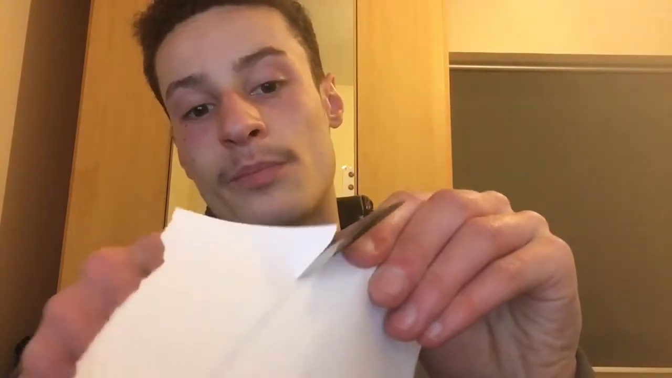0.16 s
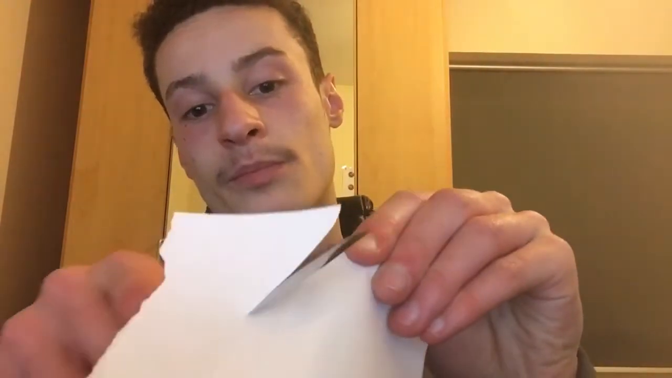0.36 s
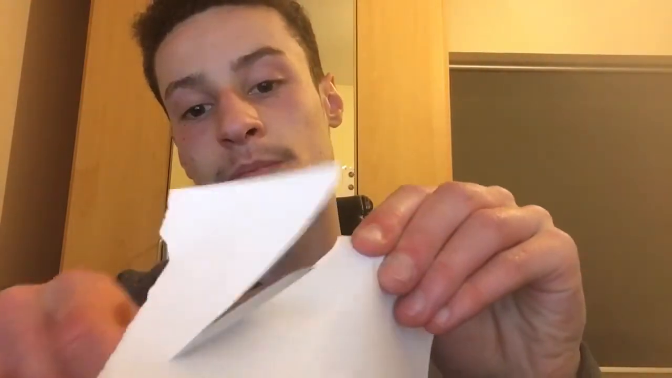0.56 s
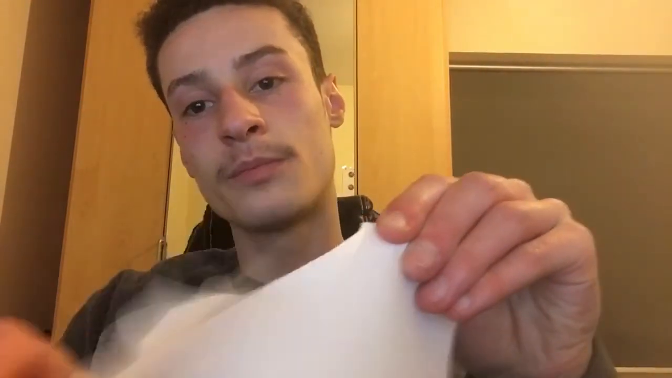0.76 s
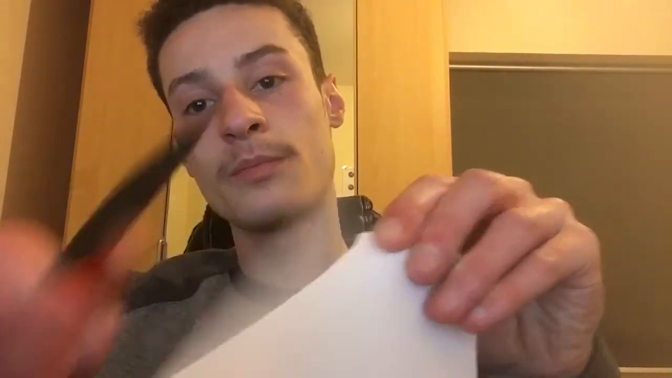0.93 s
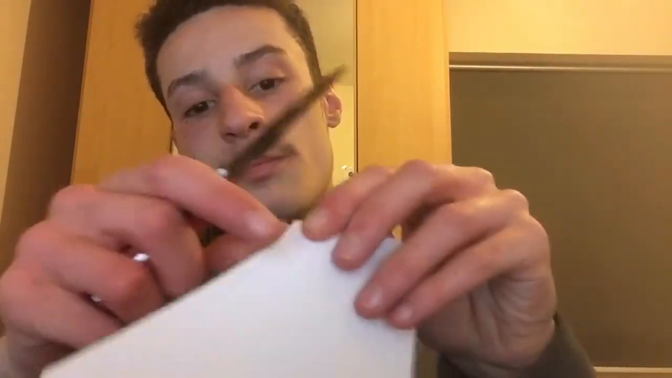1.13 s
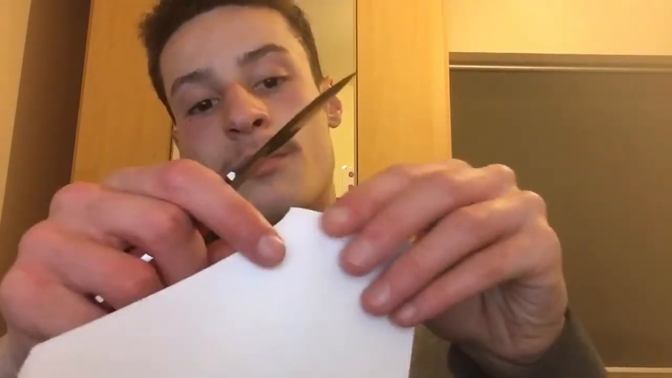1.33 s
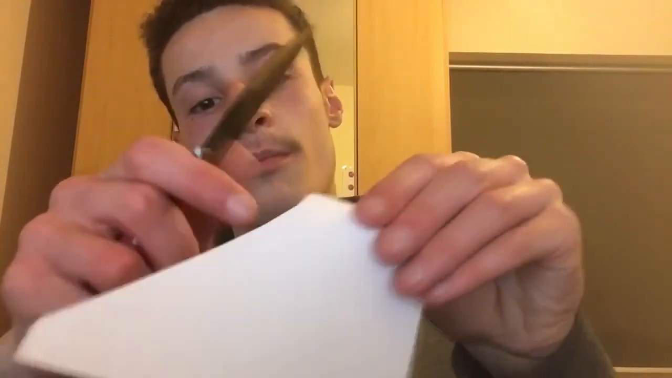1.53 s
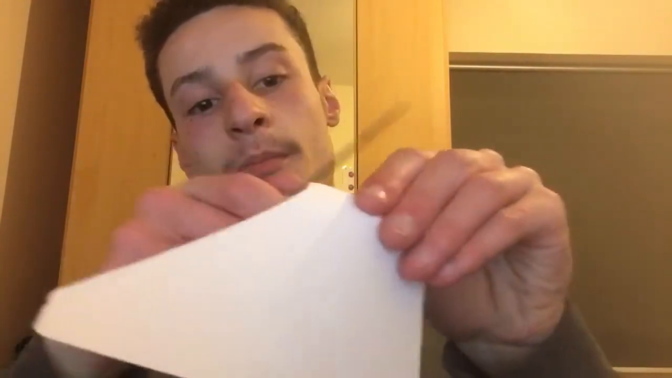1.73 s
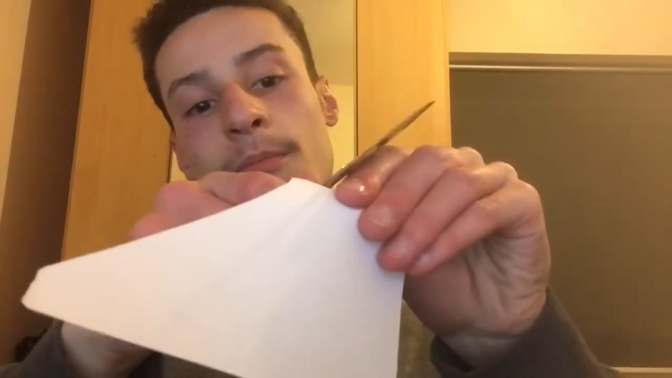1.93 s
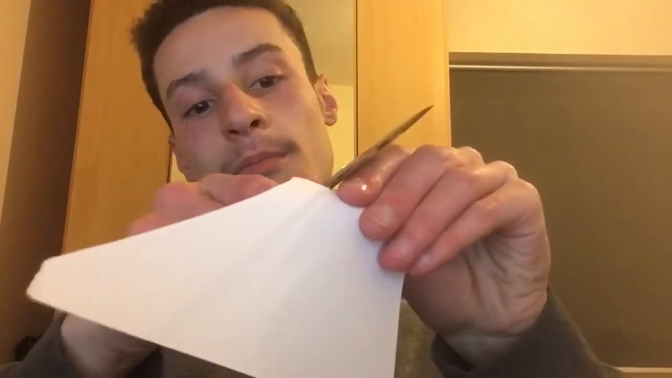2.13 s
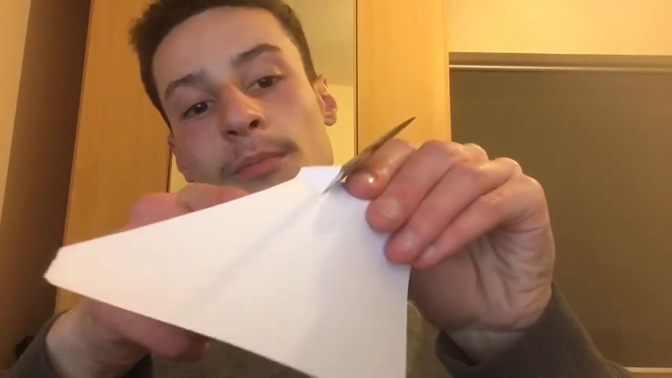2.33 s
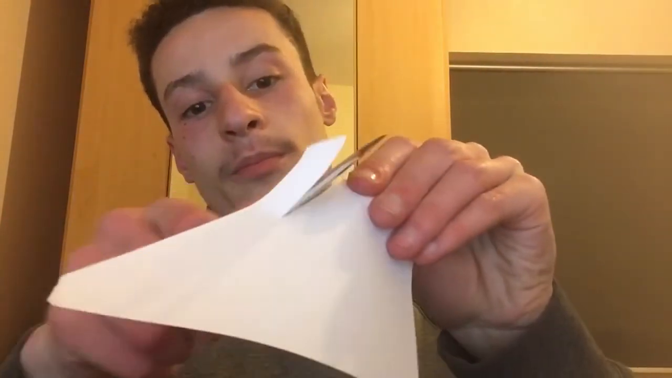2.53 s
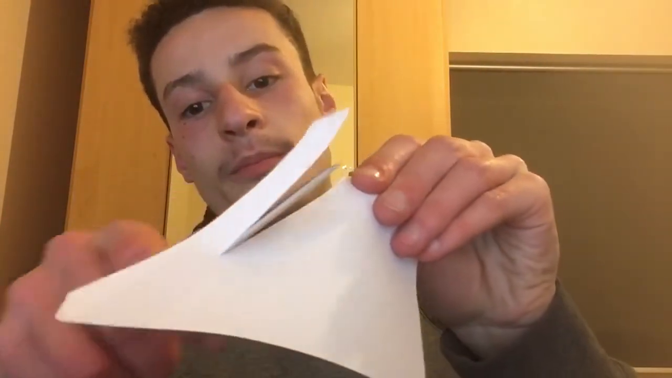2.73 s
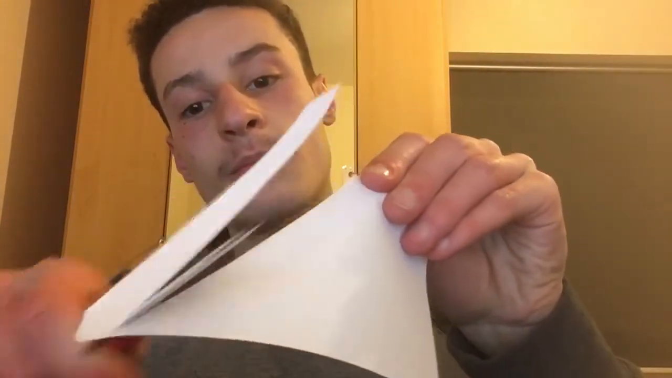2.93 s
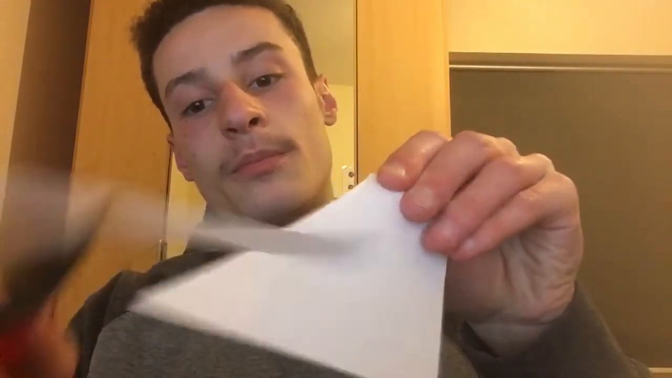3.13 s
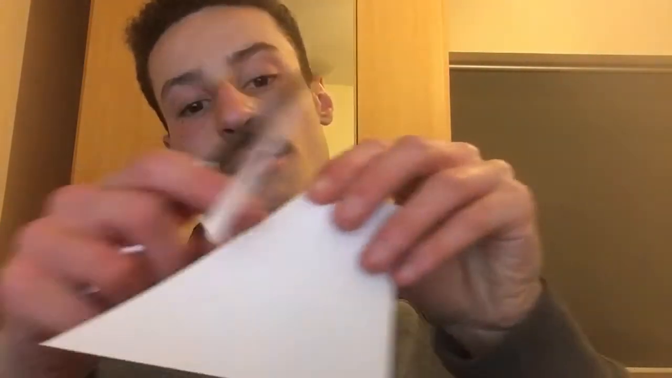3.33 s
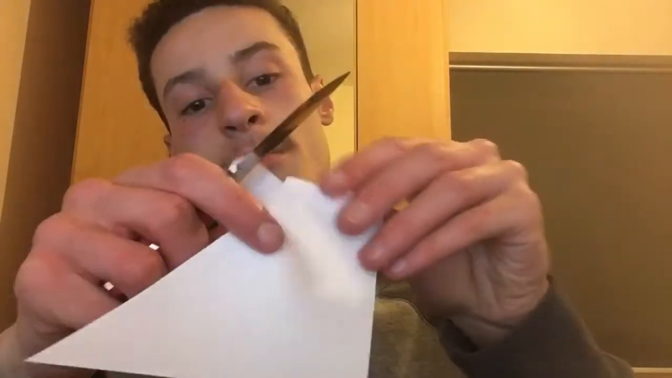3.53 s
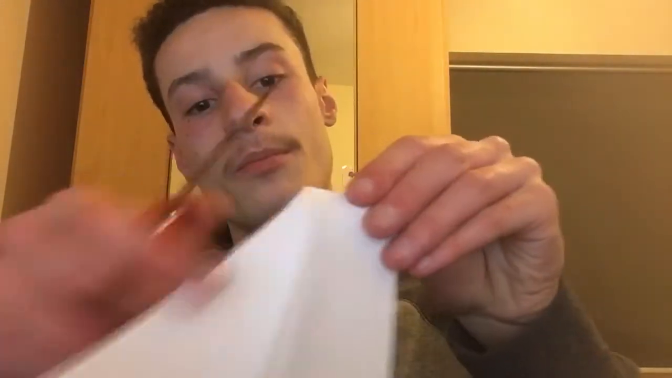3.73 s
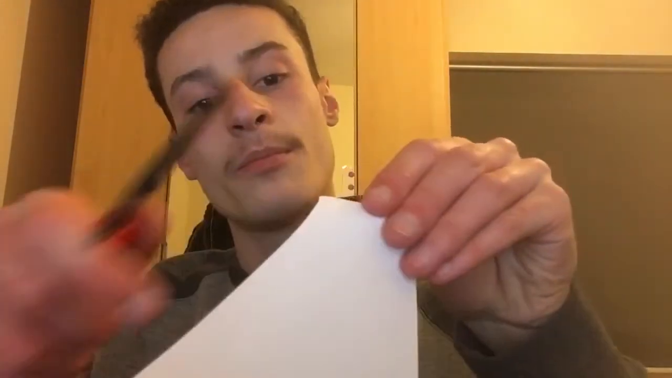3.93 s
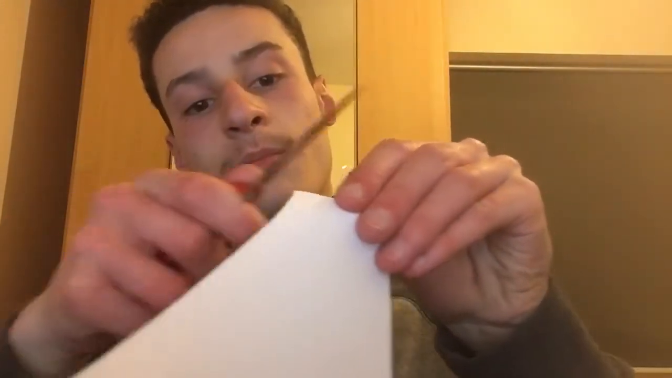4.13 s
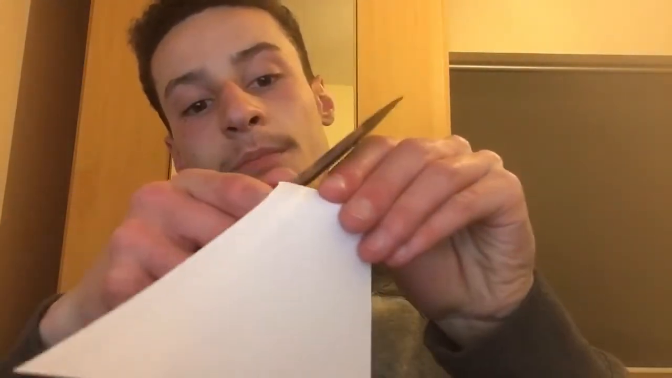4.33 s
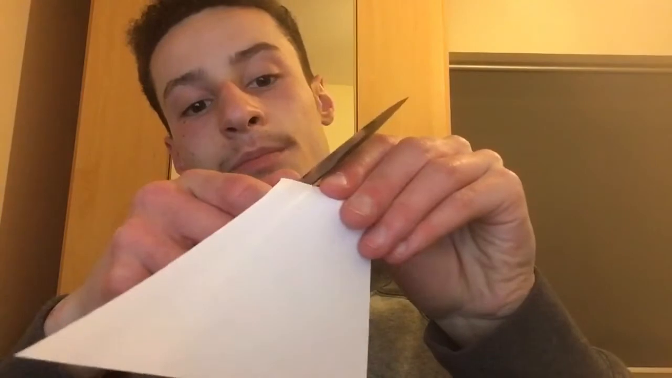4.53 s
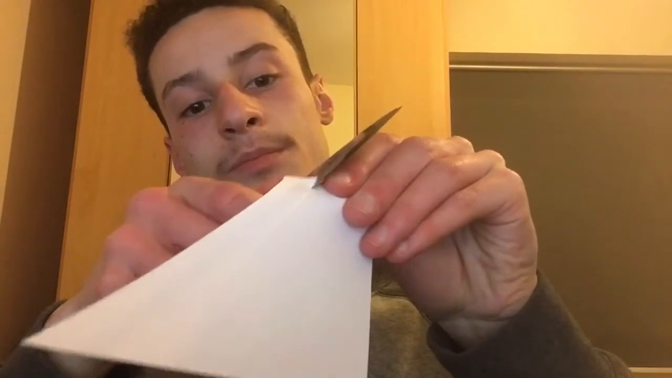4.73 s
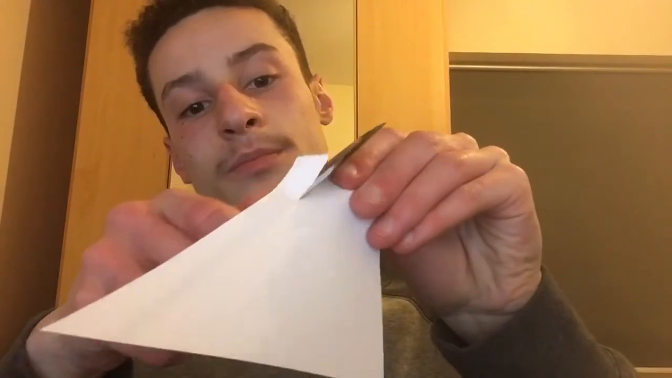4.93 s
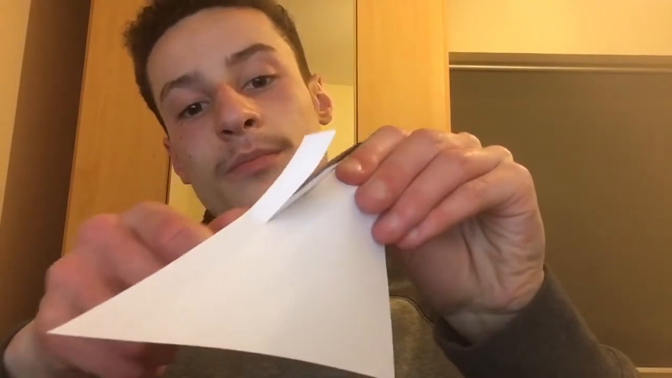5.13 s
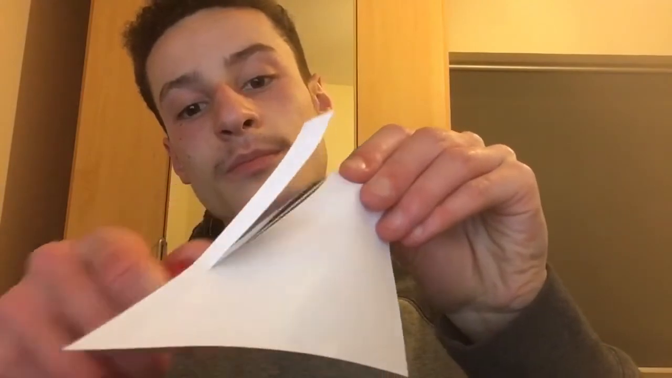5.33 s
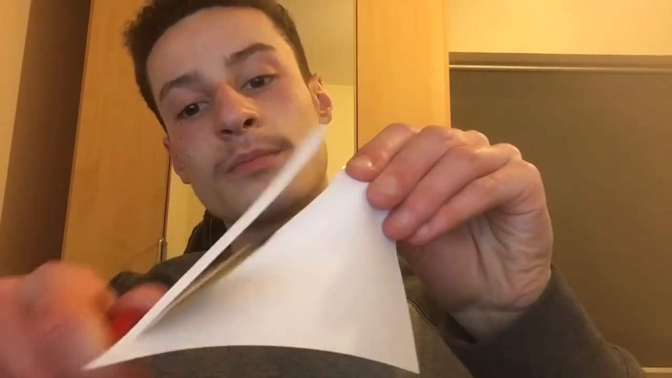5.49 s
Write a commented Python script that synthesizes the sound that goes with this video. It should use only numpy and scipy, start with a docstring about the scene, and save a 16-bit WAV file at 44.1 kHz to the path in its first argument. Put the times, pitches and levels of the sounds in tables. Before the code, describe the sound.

Very close, a sharp knife immediately slices a strip off a sheet of paper with a bright, rasping hiss of about half a second. The sheet rustles, crackles and pops softly as it is regripped. A second cut begins slowly and speeds up, more handling follows, then two tiny edge scrapes lead into a third cut. Small, quiet indoor room with a barely audible hum and short reflections.

```python
"""A faint appliance hum and soft air lie under everything in a small room: steady partials and shaped noise.
A sharp knife at once slices a strip off a hand-held sheet of paper, close by: a stream of snapping fibres
excites the sheet, the rasp and the hiss, while noise through sinking resonances makes the strip flutter lower.
As each strip comes free the sheet is regripped: sparse creases rustle, bent tones pop, noise bursts crackle.
A second cut follows at 2 s; near 4.5 s the blade scrapes the edge twice, then makes the third and last cut."""
import sys
import numpy as np
from scipy import signal
from scipy.fft import rfft, irfft, next_fast_len
from scipy.io import wavfile
from scipy.ndimage import map_coordinates

SR = 44100
rng = np.random.default_rng(int(sys.argv[2]) if len(sys.argv) > 2 else 0)


def digitize_waveform(pressure):
    """Quantize a signal to 16-bit integers and store it at the path in sys.argv[1].

    Rows of a 2-D input are taken as channels; values are limited to [-1, 1].
    """
    field = np.atleast_2d(pressure).T
    bounded = np.clip(field, -1, 1)
    quanta = np.round(bounded * 32767).astype(np.int16)
    wavfile.write(sys.argv[1], SR, quanta)


N = 245195

# Partials of the appliance hum: pitch_hz, level_db
HUM_PARTIALS = [(53, -66), (120, -73.5), (576, -71.5), (1152, -85.5), (1696, -83)]
# Colour of the air noise: frequency_hz, density_db (per Hz, relative)
AIR_COLOUR = [(15, -36.5), (25, -15), (123, -3.5), (170, -11.5), (309, -0.5), (489, -8.5), (575, -5),
              (863, -13), (1560, -13.5), (1700, -12), (2050, -15.5), (2840, -15.5), (4870, -26),
              (14000, -36.5), (16000, -47.5)]
# Each cut: the blade bites at the edge, then runs down the sheet until the strip comes free:
# start_s, run_s, end_s, sheet_swell_s, sheet_bite_db, sheet_run_db, rasp_bite_db, rasp_run_db,
# hiss_bite_db, hiss_run_db, hiss_missing_at_contact_db, best_glide_at (share of run, 0-1),
# strip_against_sheet_db, hollow_ring_db, stub_bending_hz, blade_resonance_at_run_hz, rasp_hz,
# late_hiss_hz, treble_gap_at_glide_hz
CUTS = [(0.0, 0.01, 0.627, .17, -34.8, -26.8, -37, -32, -32.5, -35.6, 6, .47, -20, -24, 540, 3100, 5600, 13300, 7700),
        (2.027, 2.29, 2.884, .26, -39.5, -27.8, -40, -32, -40.8, -33.7, 25, .45, -21.5, -10, 680, 2500, 7000, 12000, 12500),
        (4.602, 4.98, 5.486, .15, -39.3, -28.4, -40.5, -36, -42.5, -33.8, 13, .32, -22.5, -7, 430, 2650, 6000, 12300, 12000)]
# Colours of the cut, low to high: frequency_hz, density_db (per Hz, relative)
SHEET_COLOUR = [(150, -41), (600, -19.5), (920, -14), (1100, -9.5), (1300, -1.5), (1560, -1.5), (1900, 5.5),
                (2090, -3.5), (2350, 3), (3000, -1), (4300, -6.5), (4900, -23), (6500, -38.5),
                (12000, -77.5)]
RASP_COLOUR = [(2000, -38), (4200, -2.5), (5000, -3.5), (6100, -3), (7500, -8.5), (9300, -9),
               (10500, -16.5), (13000, -35.5)]
HISS_COLOUR = [(8000, -27.5), (10500, -13), (11700, -1.5), (12500, -3), (13800, -8.5), (15800, -13.5)]
# The blade catches around its entry and exit: start_s, level_db, t60_s
CATCHES = [(0.612, -26.5, .05), (2.057, -34.5, 0.049), (2.065, -34, 0.0089), (2.091, -34, .01),
           (2.879, -33.5, 0.008), (4.446, -34, 0.027), (4.606, -44, 0.032), (5.4815, -19, 0.013)]
# Colour of a catch: frequency_hz, density_db (per Hz, relative)
CATCH_COLOUR = [(200, -18), (800, -8), (1400, 3), (2200, -7.5), (4000, 1), (5200, -4), (10000, -11),
                (12500, -11), (15800, -13)]
# The sheet rustles as it is let go or regripped: peak_s, rustle_db, crinkle_db, rise_s, t60_s
RUSTLES = [(.635, -52.5, -53, .02, 0.34), (0.686, -62, -52, 0.042, 0.24), (1.074, -55, -72, 0.031, 1.06),
           (1.289, -62, -67, 0.17, 0.3), (1.431, -60, -77, .1, 0.17), (1.982, -75, -77, 0.29, 0.76),
           (2.9, -57.5, -76, 0.018, 0.4), (2.96, -53, -80, .015, 0.29), (3.018, -64.5, -69, .06, 0.36),
           (3.395, -66, -67.5, .15, 0.74), (3.49, -63, -82, .12, 1.6), (3.82, -60, -72.5, 0.31, 0.42),
           (5.498, -44, -43.5, .01, 0.093)]
# Body and treble colours of a rustle: frequency_hz, density_db (per Hz, relative)
RUSTLE_COLOUR = [(100, -24), (330, 17.5), (800, 0.5), (1400, 2.5), (2800, -1), (4300, -7), (7000, -18)]
CRINKLE_COLOUR = [(2500, -26), (4500, -3.5), (7000, 3.5), (10000, -10.5), (12500, -0.5), (15800, -12)]
# The sheet buckles with a dull pop: start_s, level_db, pitch_hz, t60_s
POPS = [(.631, -43.5, 85, 0.057), (.986, -37.5, 593, .08), (.991, -40, 318, 0.059), (1.01, -50, 90, 0.13),
        (1.066, -37.5, 320, 0.041), (1.067, -48, 99, .12), (1.142, -48.5, 346, .14),
        (1.244, -50, 258, .046), (1.245, -42, 106, 0.051), (2.885, -44, 120, 0.037),
        (3.36, -47.5, 257, .088), (3.37, -44, 104, 0.067), (3.616, -52, 380, .09), (5.493, -40, 283, .06)]
# The handled paper snaps: peak_s, level_db, brightness_db (per octave above 1 kHz), t60_s
SNAPS = [(.738, -45.5, 3, 0.043), (0.985, -49, 1.5, 0.037), (1.062, -41.5, 0, .065),
         (1.068, -42.5, 1, 0.034), (1.163, -36.5, -1, 0.027), (1.229, -43, -1, 0.02),
         (1.2397, -28.5, 4.5, .011), (1.242, -42.5, -5, .05), (1.295, -36.5, -2, 0.036),
         (1.365, -48, -0.5, 0.056), (1.915, -53.5, 3, .014), (1.935, -56.5, 2.5, .047),
         (1.961, -54.5, 3, 0.096), (1.984, -50, 4, 0.01), (2.943, -36, 0.5, 0.039), (3.232, -52, 3.5, .02),
         (3.333, -46.5, 1, 0.031), (3.342, -43, 2, 0.011), (3.359, -42, -6, .03), (3.392, -49.5, 1, .02),
         (3.749, -48, 6.5, 0.016), (3.775, -41, 8, 0.02), (4.367, -49.5, 4.5, 0.017)]
# Colour of a snap: frequency_hz, density_db (per Hz, relative)
SNAP_COLOUR = [(100, -5), (400, -4), (900, -3), (1400, 4.5), (2000, 2.5), (3000, -1.5), (4000, -6.5),
               (5200, -10), (10000, -20.5), (12500, -22), (15800, -30)]
# Fingers and blade slide along the sheet:
# peak_s, level_db, bell_width_s, brightness_db (per octave above 1 kHz)
SLIDES = [(1.433, -47.5, 0.013, 5.5), (1.452, -44, 0.0087, -1.5), (3.041, -56, 0.01, 13),
          (3.205, -63, 0.019, 14.5), (3.366, -48, 0.014, 2), (3.453, -56.5, 0.026, 9),
          (3.565, -57, 0.012, 11)]
# Colour of a slide: frequency_hz, density_db (per Hz, relative)
SLIDE_COLOUR = [(100, -4), (500, -4.5), (900, -0.5), (1450, 7.5), (2100, -3), (3200, -11.5), (5000, -24),
                (15000, -43.5)]
# The blade scrapes the edge without entering: start_s, length_s, level_db
SCRAPES = [(4.45, 0.074, -46.5), (4.525, 0.077, -52)]
# Decay of the room: frequency_hz, t60_s
ROOM_DECAY = [(200, 0.1976), (2000, 0.3), (6000, 0.18), (14000, 0.2)]

ATTACK_S, RELEASE_S, SPEED_UP_S = 0.0028, 0.0027, 0.094  # the blade enters, leaves, gathers speed
# rise of each layer as pressure builds before the run; a negative rise is a fall
BITE_DB_PER_S, RASP_BITE_DB_PER_S, HISS_BITE_DB_PER_S = 6.5, 3, -22.5
SHEET_FADE_DB, RASP_FADE_DB, STRIP_FADE_DB = -2.5, -4.5, -6.5  # change over one run
EXIT_DB, EXIT_S = 0.5, 0.07  # the last fibres tear with a harder rasp
# the hiss builds up after contact; the lower layers follow by these shares of its rise
HISS_LAG_S, SHEET_LAG_SHARE, RASP_LAG_SHARE = .2, .12, 0.27
# a gliding edge is smoother (widths and places are shares of the run)
GLIDE_WIDTH, GLIDE_RASP_DB, GLIDE_HISS_DB = 0.17, -6.5, -10.5
# a gap slides down the treble in the glide: fall over one run, width in octaves, depth
NOTCH_OCTAVES, NOTCH_WIDTH, NOTCH_DB = 2.3, 0.31, -3
# late swell of the hiss, and its change over the run
HISS_PEAK_AT, HISS_PEAK_WIDTH, HISS_PEAK_DB, HISS_FADE_DB = 0.65, .2, 5.9, -11.5
HISS_START_HZ = 14800  # the hiss sinks from about here to its late pitch
BITE_HZ, BLADE_RISE_HZ = 3600, 2200  # blade resonance well before the run, and its climb over the run
BLADE_DB, BLADE_PEAK_DB, BLADE_PEAK_AT, BLADE_WIDTH = -12, 9, 0.4, 0.24  # base and early swell
STRIP_END_HZ, STRIP_BITE_DB = 197.6, -6  # full-length first bending mode; the stub is quieter
TOP_HZ = 16000  # band limit


def amp(db):
    """Decibels to gain."""
    return 10 ** (np.asarray(db) / 20)


def unit(x):
    """Scale to rms 1."""
    return x / np.sqrt(np.mean(x ** 2) + 1e-20)


def along(points, hz):
    """Read (frequency, value) points on a log frequency axis."""
    f, v = np.transpose(points)
    return np.interp(np.log(hz + 1), np.log(f + 1), v)


def bump(x, centre, width):
    """A bell of height 1."""
    return np.exp(-.5 * ((x - centre) / width) ** 2)


def wobble(rate, size):
    """A smooth random curve with rate knots a second."""
    knots = rng.standard_normal(int(size * rate / SR) + 4)
    return map_coordinates(knots, [np.arange(size) * rate / SR])


def coloured(x, spectrum, tilt_db=0):
    """x shaped by a spectrum and a tilt per octave above 1 kHz, at rms 1."""
    size = next_fast_len(len(x) + 4096)
    hz = np.fft.rfftfreq(size, 1 / SR)
    tilt = tilt_db * np.log2(np.maximum(hz / 1000, 1))
    gain = amp(along(spectrum, hz) + tilt)
    return unit(irfft(rfft(x, size) * gain, size)[:len(x)])


def resonate(x, t, centre_hz, q):
    """x through a resonance whose centre moves with time, at rms 1."""
    hz, s, z = signal.stft(x, SR, nperseg=1024, noverlap=896)
    ratio = (hz[:, None] + 1) / np.interp(s + t[0], t, centre_hz)
    z = z / (1 + 1j * q * (ratio - 1 / ratio))
    return unit(signal.istft(z, SR, nperseg=1024, noverlap=896)[1][:len(x)])


def notched(x, t, centre_hz, depth_db):
    """x with a dip in its spectrum whose centre and depth move with time."""
    hz, s, z = signal.stft(x, SR, nperseg=512, noverlap=384)
    octaves = np.log2((hz[:, None] + 1) / np.interp(s + t[0], t, centre_hz))
    dip_db = np.interp(s + t[0], t, depth_db) * bump(octaves, 0, NOTCH_WIDTH)
    return signal.istft(z * amp(dip_db), SR, nperseg=512, noverlap=384)[1][:len(x)]


def add(track, s, sound):
    """Mix a sound into the track at time s."""
    part = track[max(0, round(s * SR)):][:len(sound)]
    part += sound[:len(part)]


def background():
    """A slightly unsteady appliance hum over soft air noise."""
    t = np.arange(N) / SR
    hum = np.zeros(N)
    for hz, db in HUM_PARTIALS:
        level = amp(db + 0.79 * wobble(2.9, N)) * np.sqrt(2)  # rms to peak
        hum += level * np.sin(2 * np.pi * hz * t + 0.5 * wobble(4.1, N))
    return hum + amp(-66.5) * coloured(rng.standard_normal(N), AIR_COLOUR)


def stroke(start, end):
    """Sample times of a stroke of the blade and its attack, hold and release."""
    t = np.arange(start, end, 1 / SR)
    return t, np.clip(np.minimum((t - start) / ATTACK_S, (end - t) / RELEASE_S), 0, 1)


def fibres(size, rate, spread_db):
    """Tiny snaps of either sign and uneven strength; the power does not depend on their rate."""
    happens = rng.random(size) < rate / SR
    strength = amp(spread_db * np.clip(rng.standard_normal(size), -2, 2)) / np.sqrt(rate)
    return unit(happens * rng.choice([-1, 1], size) * strength)


def flexing(x, depth_db, width_hz, life):
    """The many small modes of the bending sheet: narrow peaks that come and go."""
    hz, s, z = signal.stft(x, SR, nperseg=1024, noverlap=768)
    grid = np.meshgrid(hz / width_hz, s / life, indexing="ij")
    field = map_coordinates(rng.standard_normal(size=(400, 40)), grid, mode="wrap")
    return unit(signal.istft(z * amp(depth_db * field), SR, nperseg=1024, noverlap=768)[1][:len(x)])


def shaken_sheet(snaps, t, blade_hz, blade_db, hollow_db):
    """Fibre snaps shake the sheet, ring at the blade and sound hollower late in the cut."""
    body = coloured(snaps, SHEET_COLOUR)
    loose = np.clip(np.linspace(-2, 1.4, len(t)), 0, 1)  # the sheet loosens
    ring_hz = np.full(len(t), 1220)
    hollow = loose * resonate(resonate(body, t, ring_hz, q=2.1), t, ring_hz, q=2.0)
    at_blade = resonate(body, t, blade_hz * np.exp(.03 * wobble(25, len(t))), q=6)
    return unit(body + amp(blade_db) * at_blade + amp(hollow_db) * hollow)


def fluttering_strip(grip, t, bend_hz):
    """The strip is a cantilever: its first two bending modes sink as it lengthens."""
    flutter = grip * rng.standard_normal(len(t))
    first_mode = resonate(resonate(flutter, t, bend_hz, q=2.5), t, bend_hz, q=3.6)
    second_mode = resonate(flutter, t, 2.75 * bend_hz, q=12)
    return first_mode + amp(-1) * second_mode


def edge_treble(snaps, t, rasp_db, hiss_db, rasp_hz, hiss_hz, gap_hz, gap_db):
    """Rasp and hiss of the edge, changing colour as the angle of the blade wavers."""
    angle = np.exp(0.18 * wobble(13, len(t)))
    rasp, hiss = coloured(snaps, RASP_COLOUR), coloured(snaps, HISS_COLOUR)
    rasp = unit(rasp + amp(-4) * resonate(rasp, t, rasp_hz * angle, q=5))
    hiss = unit(hiss + amp(-5.0) * resonate(hiss, t, hiss_hz * angle ** 0.31, q=12))
    mix = amp(rasp_db) * rasp + amp(hiss_db) * hiss
    return notched(mix, t, gap_hz * angle ** .5, gap_db)


def cutting():
    """The edge snaps fibres in a dense stream that drives the sheet, as the growing strip flutters."""
    out = np.zeros(N)
    for (start, run, end, swell_s, sheet_bite_db, sheet_run_db, rasp_bite_db, rasp_run_db,
         hiss_bite_db, hiss_run_db, lag_db, glide_at, strip_db, hollow_db, stub_hz, run_hz,
         rasp_hz, late_hz, notch_hz) in CUTS:
        t, gate = stroke(start, end)
        # pressure builds, the blade gathers speed, the rest follows its progress down the sheet
        wait = np.maximum(run - t, 0)
        speed = np.clip((t - run) / SPEED_UP_S, 0, 1)
        progress = np.clip((t - run) / (end - run), 0, 1)
        swell = np.clip((t - run) / swell_s, 0, 1)
        contact_db = np.interp(t - start, [0, HISS_LAG_S], [-lag_db, 0])
        glide = bump(progress, glide_at, GLIDE_WIDTH)

        sheet_db = (np.interp(swell, [0, 1], [sheet_bite_db, sheet_run_db])
                    - BITE_DB_PER_S * wait + SHEET_FADE_DB * progress + SHEET_LAG_SHARE * contact_db)
        rasp_db = (np.interp(speed, [0, 1], [rasp_bite_db, rasp_run_db])
                   - RASP_BITE_DB_PER_S * wait + RASP_FADE_DB * progress + RASP_LAG_SHARE * contact_db
                   + GLIDE_RASP_DB * glide + EXIT_DB * np.exp((t - end) / EXIT_S))
        hiss_db = (np.interp(speed, [0, 1], [hiss_bite_db, hiss_run_db])
                   - HISS_BITE_DB_PER_S * wait + HISS_FADE_DB * progress + contact_db
                   + GLIDE_HISS_DB * glide
                   + HISS_PEAK_DB * bump(progress, HISS_PEAK_AT, HISS_PEAK_WIDTH))
        blade_db = BLADE_DB + BLADE_PEAK_DB * bump(progress, BLADE_PEAK_AT, BLADE_WIDTH)
        bend_db = strip_db + STRIP_BITE_DB * (1 - swell) + STRIP_FADE_DB * progress

        blade_hz = np.interp(wait, [0, SPEED_UP_S], [run_hz, BITE_HZ]) + BLADE_RISE_HZ * progress
        bend_hz = 1 / np.interp(progress, [0, 1], [1 / stub_hz, 1 / STRIP_END_HZ])
        hiss_hz = np.interp(progress, [0, HISS_PEAK_AT], [HISS_START_HZ, late_hz])
        gap_hz = notch_hz * 2 ** (NOTCH_OCTAVES * (glide_at - progress))

        # the blade sticks and slips on the uneven pulp
        grip = unit(amp(0.6 * wobble(69.75, len(t)) + 1.2 * wobble(500, len(t))))
        # a slow blade parts fewer fibres a second and sounds grittier
        density = np.interp(sheet_db, [-52, -30], [4000, 30000])
        snaps = grip * fibres(len(t), rate=density, spread_db=0.54)
        snaps = flexing(snaps, depth_db=2.6, width_hz=110, life=.11)

        sheet = shaken_sheet(snaps, t, blade_hz, blade_db, hollow_db)
        strip = fluttering_strip(grip, t, bend_hz)
        treble = edge_treble(snaps, t, rasp_db, hiss_db, rasp_hz, hiss_hz, gap_hz, NOTCH_DB * glide)
        add(out, t[0], gate * (amp(sheet_db) * (sheet + amp(bend_db) * strip) + treble))
    return out


def room(x):
    """The short answer of the walls: decaying noise, each band at its own pace, 5 ms late."""
    hz, t, z = signal.stft(rng.standard_normal(SR // 2), SR, nperseg=256)
    decay = amp(-60 * t / along(ROOM_DECAY, hz)[:, None])
    tail = signal.istft(z * decay, SR, nperseg=256)[1]
    tail = np.pad(tail / np.linalg.norm(tail), (SR // 200, 0))
    return signal.fftconvolve(x, tail)[:N]


def catches():
    """A bundle of fibres parts at once: a dry tick with little bass."""
    out, t = np.zeros(N), np.arange(SR // 10) / SR
    for s, db, t60 in CATCHES:
        tick = coloured(rng.standard_normal(len(t)), CATCH_COLOUR)
        add(out, s, amp(db - 60 * t / t60) * tick)
    return out


def rustling():
    """Sparse creases give way while the fingers shift; each rustle swells and dies away."""
    out = np.zeros(N)
    for s, rustle_db, crinkle_db, rise, t60 in RUSTLES:
        t = np.arange(-rise, t60, 1 / SR)
        swell = amp(np.minimum(30 * t / rise, -60 * t / t60))  # up 30 dB, down 60 dB
        uneven = unit(amp(5.4 * wobble(78.6, len(t))))
        creases = fibres(len(t), rate=4400, spread_db=2) * uneven
        rustle = amp(rustle_db) * coloured(creases, RUSTLE_COLOUR)
        crinkle = amp(crinkle_db) * coloured(creases, CRINKLE_COLOUR)
        add(out, s - rise, swell * (rustle + crinkle))
    return out


def pops():
    """The slack sheet buckles: a dying tone with no steady pitch."""
    out, t = np.zeros(N), np.arange(SR // 5) / SR
    for s, db, hz, t60 in POPS:
        wavering_hz = hz * np.exp(.13 * wobble(350, len(t)))
        phase = 2 * np.pi * np.cumsum(wavering_hz) / SR
        onset = 1 - np.exp(-t / 0.0003)
        add(out, s, amp(db - 60 * t / t60) * onset * np.sin(phase))
    return out


def crackles():
    """A crease creaks before it gives way: noise that rises four times as steeply as it dies."""
    out, t = np.zeros(N), np.arange(SR // 5) / SR
    lead = .012  # s before the peak
    for s, db, bright_db, t60 in SNAPS:
        shape_db = np.minimum(240 * (t - lead) / t60, -60 * (t - lead) / t60)
        snap = coloured(rng.standard_normal(len(t)), SNAP_COLOUR, bright_db)
        add(out, s - lead, amp(db + shape_db) * snap)
    return out


def slides():
    """Short slides along the paper: very uneven fibre snaps under a bell."""
    out, t = np.zeros(N), np.arange(SR // 5) / SR
    for s, db, width, bright_db in SLIDES:
        swell = bump(t, t.mean(), width)
        grains = fibres(len(t), rate=4000, spread_db=6.5)
        add(out, s - t.mean(), amp(db) * swell * coloured(grains, SLIDE_COLOUR, bright_db))
    return out


def scraping():
    """The blade drags over the edge of the sheet and plucks only a few fibres."""
    out = np.zeros(N)
    for s, length, db in SCRAPES:
        t, gate = stroke(s, s + length)
        snaps = fibres(len(t), rate=4000, spread_db=3)
        sheet = coloured(snaps, SHEET_COLOUR)
        rasp = amp(-10) * coloured(snaps, RASP_COLOUR)
        hiss = amp(-17) * coloured(snaps, HISS_COLOUR)
        add(out, s, amp(db) * gate * (sheet + rasp + hiss))
    return out


def scene():
    """Paper close by, the room behind it."""
    paper = cutting() + catches() + rustling() + pops() + crackles() + slides() + scraping()
    return (background() + paper + amp(-12.0) * room(paper))[None]


def record(dry):
    """The microphone loses the deepest bass; nothing is kept above the band limit."""
    size = next_fast_len(N + 4096)
    hz = np.fft.rfftfreq(size, 1 / SR)
    bass = 1 - np.exp(-(hz / 36) ** 4)
    top = np.clip((TOP_HZ - hz) / 200 + .5, 0, 1)
    return irfft(rfft(dry, size) * bass * top, size)[:, :N]


dry = scene()
out = record(dry)
digitize_waveform(out)
```